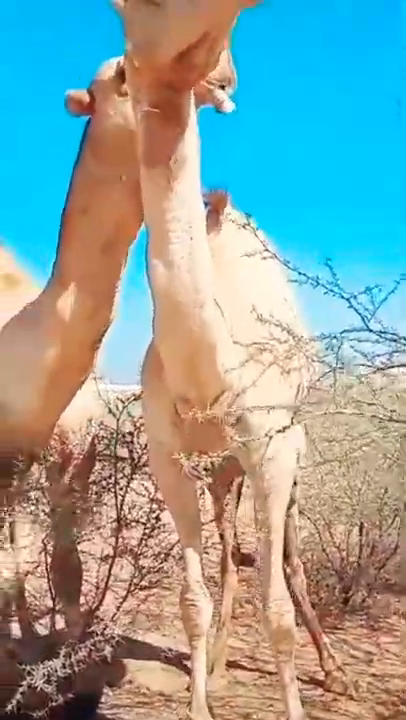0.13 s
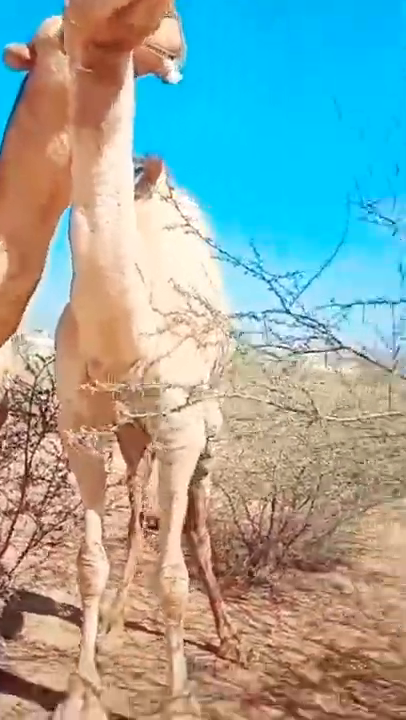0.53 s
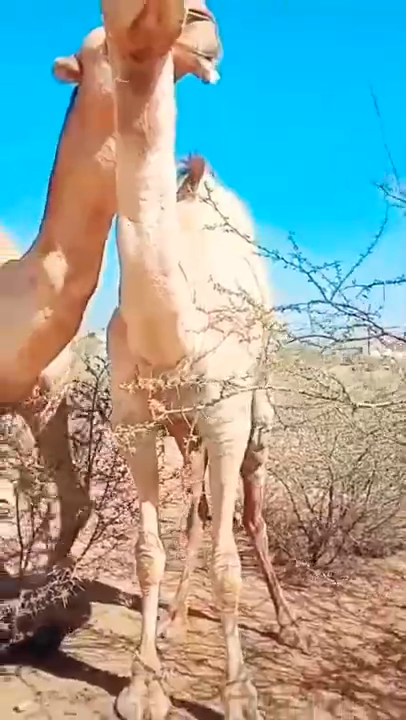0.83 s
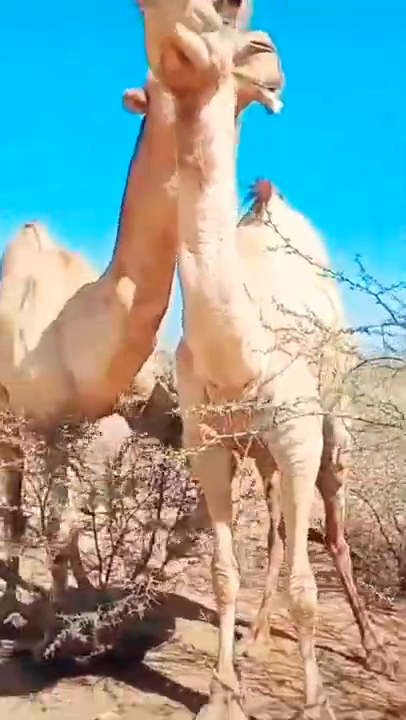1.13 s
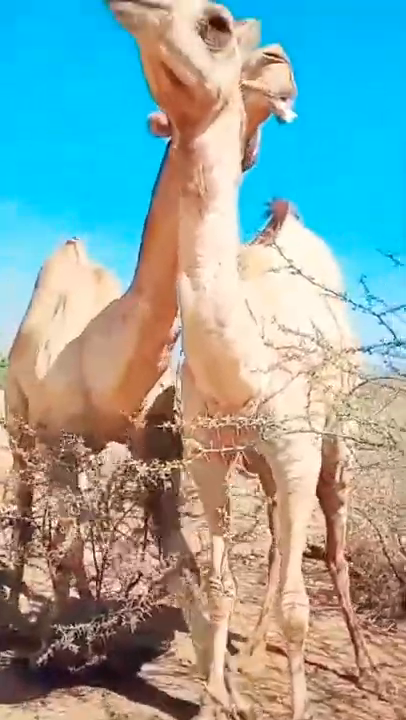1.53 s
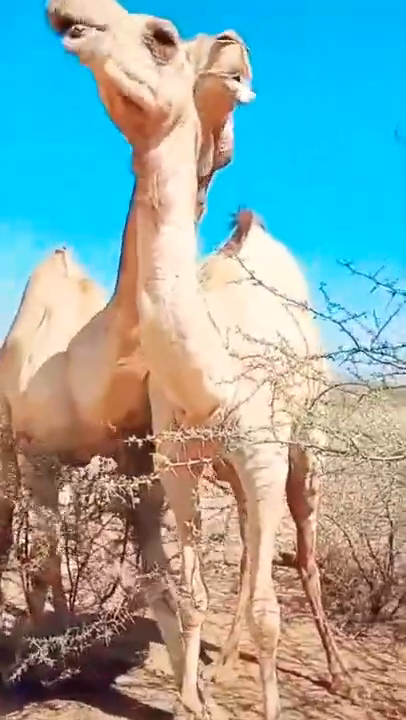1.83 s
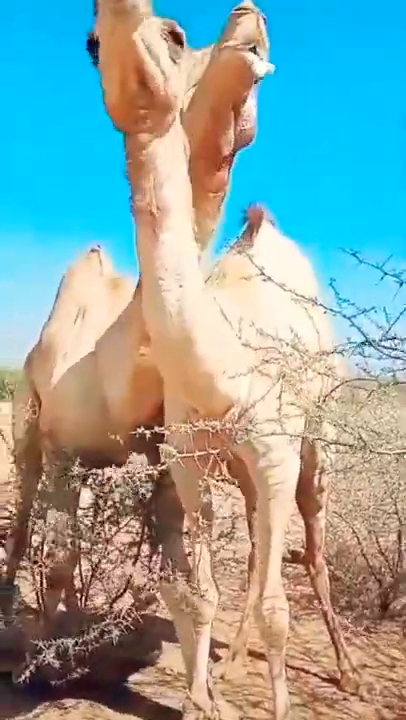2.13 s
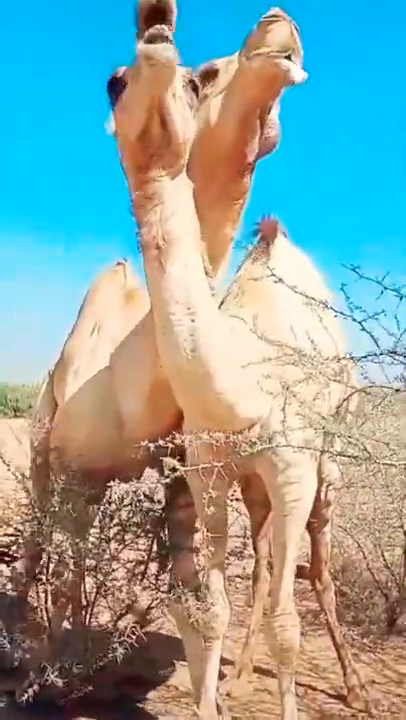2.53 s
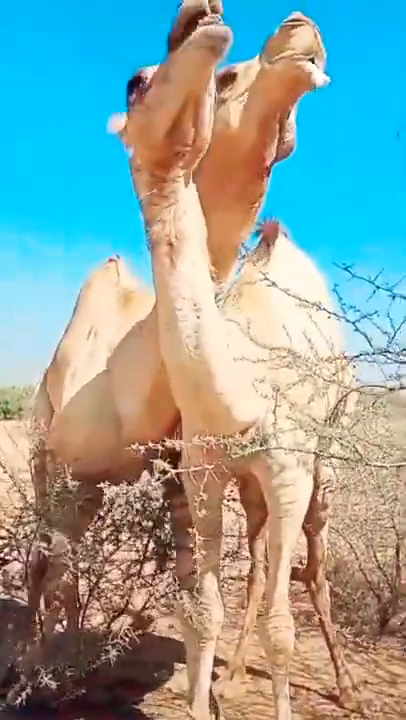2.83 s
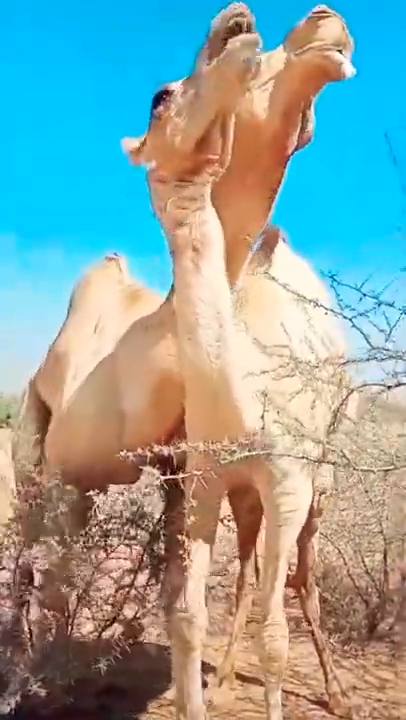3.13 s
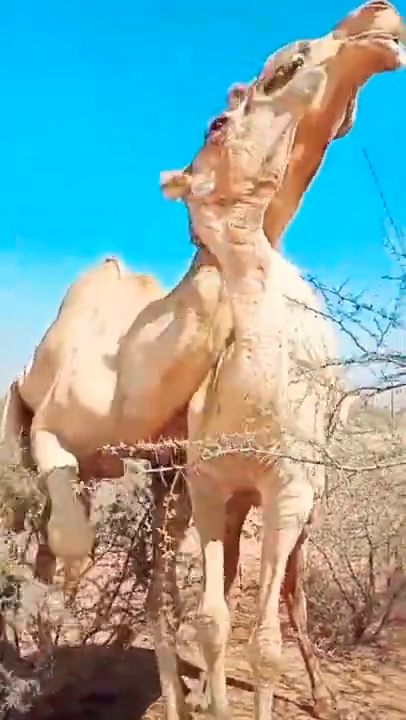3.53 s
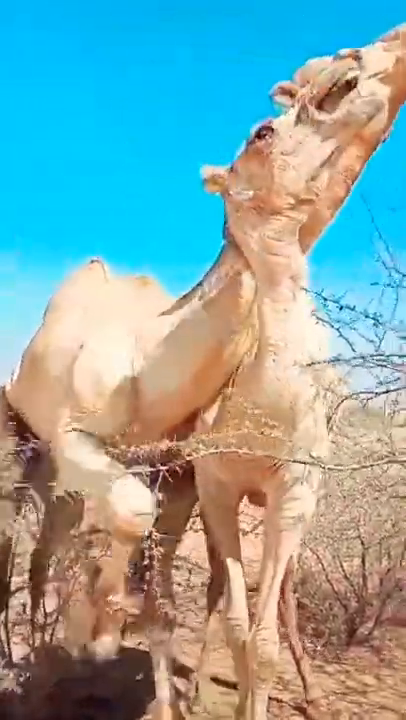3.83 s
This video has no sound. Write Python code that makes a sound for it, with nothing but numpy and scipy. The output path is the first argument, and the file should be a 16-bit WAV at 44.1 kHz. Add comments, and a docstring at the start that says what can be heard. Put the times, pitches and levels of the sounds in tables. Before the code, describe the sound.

Low rasping camel groan starting late, preceded by soft wind buffeting and crackling dry scrub.

```python
"""Camel in dry thorn scrub

Two camels stand before a hand-held mono microphone; one is heard, grumbling faintly, then starting to groan:
clear partials of a low pitch, and uneven fold pulses and breath noise ringing in chest, throat and mouth.
Gusts are filtered noise and short sagging puffs, twigs are filtered clicks and decaying bursts, the hand's
scuffs are dull grains, a hum is one wavering sine, and faint whistles are sines spread by slow noise."""
import sys
import numpy as np
from scipy import signal
from scipy.io import wavfile
from scipy.ndimage import uniform_filter1d

SR = 44100
rng = np.random.default_rng(int(sys.argv[2]) if len(sys.argv) > 2 else 0)


def to_wav(s):
    """Save 16-bit WAV."""
    ch = np.atleast_2d(s).T  # columns
    pcm = np.round(np.clip(ch, -1, 1) * 32767)  # PCM
    wavfile.write(sys.argv[1], SR, pcm.astype(np.int16))


N = 176400

# Wind noise at the microphone, before it dies away: time_s, rumble_level_db, upper_level_db
WIND_LEVELS = [(0.0, -25, -45.5), (0.05, -72, -63), (0.09, -42.5, -63), (0.17, -51, -66), (0.24, -68, -83),
               (0.49, -60.5, -63), (0.63, -63.5, -72.5), (0.76, -63, -60), (0.92, -59.5, -62),
               (1.06, -55, -74.5), (1.4, -65, -74), (1.58, -63.5, -71), (1.67, -49, -86),
               (1.78, -53.5, -84), (1.82, -54.5, -78.5), (1.99, -54.5, -67.5), (2.09, -62, -73.5),
               (2.36, -57, -70.5), (2.5, -65, -74), (2.63, -50.5, -83), (2.79, -57, -71),
               (3.01, -56.5, -72), (3.26, -63, -84), (3.34, -60, -73), (3.44, -53, -66), (3.5, -45.5, -72)]
# Noise densities of the two wind layers: frequency_hz, density_db_per_hz
RUMBLE_SPECTRUM = [(30, -14), (60, 12.5), (120, 10), (200, 11), (300, -35.5), (400, -15)]
UPPER_WIND_SPECTRUM = [(180, -51), (300, 22.5), (450, 3), (650, -8), (900, -7.5), (1300, -4.5)]
WIND_DROP_START_S, WIND_DROP_LENGTH_S = 3.55, 0.07
# Gust thumps: start_s, lower_puff_level_db, mean_pitch_hz, length_cycles, upper_puff_relative_db, sag_0_to_1
GUST_THUMPS = [(0.143, -49.5, 106.6, 2.17, 11, 0.48), (0.198, -44.5, 112, 2.7, -6, 0.55),
               (0.479, -42.5, 211, 4.1, -13, 0.4), (0.57, -44, 213, 4.3, -16, 0.06),
               (1.025, -36.5, 109, 2.67, -23, 0.8), (1.326, -41.5, 100, 2.56, -7.5, 0.46),
               (1.631, -34, 105.5, 3.2, -21, 0.5), (1.668, -55, 108, 1.9, 7, 0.8),
               (1.701, -41.5, 213, 4.5, -36, 0.34), (1.762, -41, 104, 2.7, -15, 0.62),
               (1.818, -34, 105, 1.4, -20, 0.7), (1.883, -34, 140, 4, -18, 0.79),
               (1.943, -32, 100, 3, -22, 0.75), (2.133, -36.5, 110, 2.9, -15, 0.77),
               (2.415, -30.5, 197, 2.86, -41, 0.67), (2.425, -33.5, 105, 2.3, -26, 0.95),
               (2.545, -41.5, 148, 4, -24, 0.6), (2.578, -40, 112, 1.7, -12, 0.86),
               (2.641, -28.5, 137, 2.65, -6, 1), (2.667, -38, 143, 1.53, -12, 1),
               (2.717, -39.5, 106, 2.7, -30, 0.7), (2.85, -31.5, 104.5, 3.6, -10, 0.74),
               (2.868, -31, 140.4, 3.1, -10.5, 0.84), (2.89, -29.5, 107, 1.67, -15.5, 0.63),
               (2.938, -25.5, 162, 3.55, -13.5, 0.63), (2.969, -38, 119, 2.8, -22, 0.4),
               (3.243, -26.5, 109, 4.2, -12.5, 0.4), (3.255, -21.5, 180, 3.72, -18, 0.58),
               (3.297, -33.5, 102, 2.84, -11, 0.93), (3.423, -22.5, 109.5, 2.23, -12, 0.74),
               (3.437, -31, 180, 2.9, -15.5, 0.24), (3.491, -40, 124, 3.2, -3, 0.65),
               (3.551, -34, 110, 2.3, -5, 0.18), (3.672, -33, 104, 2.6, -8, 0.53)]
UPPER_PUFF_RATIO = 2.203  # upper puff's frequency over the lower one's

# Wavering hum: time_s, level_db
HUM_LEVELS = [(0, -42), (.15, -44), (.25, -49.5), (.4, -54), (.5, -62), (.57, -81), (.65, -59.5),
              (.75, -52.5), (.95, -47.5), (1.08, -46.5), (1.2, -48.5), (1.3, -51), (1.4, -56), (1.55, -55),
              (1.7, -50.5), (1.85, -47), (2.05, -46), (2.2, -49), (2.36, -54.5), (2.45, -65), (2.52, -56),
              (2.62, -53), (2.72, -45.5), (2.76, -48.5), (2.8, -41), (2.86, -48.5), (3.0, -49.5),
              (3.11, -46.5), (3.22, -49.5), (3.4, -53.5), (3.6, -53), (3.8, -54), (4, -49)]
HUM_HZ, HUM_WAVER_DB = 90.7, 1.0

# Rustle of the scrub: time_s, low_mids_level_db, high_mids_level_db, treble_level_db, top_level_db
RUSTLE_LEVELS = [(0.0, -100, -65.5, -70.5, -80), (0.19, -72, -75, -78, -77), (0.33, -68.5, -62, -66, -69),
                 (0.51, -71, -69, -69.5, -72.5), (0.71, -68, -62, -81, -80), (0.9, -68, -62, -63, -67),
                 (1.02, -69.5, -60, -62, -62), (1.16, -70, -65.5, -63, -63), (1.3, -71.5, -68, -69, -64),
                 (1.5, -81, -75.5, -79.5, -69.5), (1.63, -73.5, -74.5, -67, -61),
                 (1.76, -75.5, -75, -73.5, -70), (1.94, -85, -78.5, -83, -73),
                 (2.19, -71.5, -69, -73, -72.5), (2.35, -80, -76.5, -81, -73), (2.62, -73, -83, -89, -80),
                 (2.82, -81, -81.5, -79.5, -73), (2.95, -60, -66, -70, -87), (3.1, -75, -73, -74, -61.5),
                 (3.25, -70, -65, -69.5, -66), (3.39, -69.5, -62, -60.5, -59),
                 (3.56, -62.5, -58.5, -63.5, -59), (3.75, -61, -53, -62.5, -54.5),
                 (3.88, -49.5, -70, -62.5, -55.5), (4.0, -55.5, -73, -72.5, -61.5)]
# Noise densities of the four rustle layers: frequency_hz, density_db_per_hz
LOW_MIDS_SPECTRUM = [(500, -4), (800, -6.5), (1300, -1.5), (1900, -9), (2600, -9)]
HIGH_MIDS_SPECTRUM = [(1500, -2), (2200, 1), (3000, 0), (4000, -3), (5000, -5), (6500, -70)]
TREBLE_SPECTRUM = [(4000, -56.5), (5200, 10), (6500, 8), (7300, 3), (8300, -8), (9300, -8)]
TOP_SPECTRUM = [(7800, -12.5), (9500, -4), (11500, 3), (13000, -11), (14200, -13), (15000, 11.5),
                (16500, -3.5)]
GRAINS_PER_S, GRAIN_SHARE = 900, 0.45
# Crunches of dry twigs: start_s, length_s, low_mids_level_db, high_mids_level_db, treble_level_db
TWIG_CRUNCHES = [(0.04, 0.023, -68, -61.5, -67), (0.346, 0.14, -64, -58.5, -78),
                 (0.46, 0.082, -69, -69, -86), (0.634, 0.11, -90, -60.5, -58.5),
                 (0.83, 0.027, -49, -55, -85), (0.849, 0.033, -46.5, -54.5, -68),
                 (1.311, 0.058, -78, -80, -61.5), (1.448, 0.088, -70, -64.5, -64),
                 (1.498, 0.18, -71, -65.5, -56), (1.626, 0.099, -66.5, -62.5, -76),
                 (1.895, 0.019, -77, -80, -66), (1.937, 0.053, -86, -79, -63),
                 (2.076, 0.047, -88, -66, -57), (2.191, 0.017, -86, -90, -62),
                 (2.245, 0.088, -66.5, -73, -77), (2.388, 0.036, -73.5, -74, -66.5),
                 (2.585, 0.064, -74, -89, -70), (2.881, 0.1, -58, -54, -64),
                 (2.974, 0.08, -64.5, -62.5, -69), (3.128, 0.098, -65.5, -65, -63),
                 (3.262, 0.076, -64.5, -67, -67), (3.648, 0.058, -45.5, -60, -51),
                 (3.907, 0.017, -51, -72, -57)]
CRUNCH_GRAINS_PER_S = 2800
FADE_SHARE = 0.41  # each fade of a crunch or scuff, as a share of its length
# Twig snaps: start_s, peak_db, treble_relative_db, t60_s
TWIG_SNAPS = [(0.0366, -51.5, 16, 0.014), (0.1552, -45, -3.5, 0.064), (0.2232, -22, -9, 0.013),
              (0.7147, -35.5, -21, 0.014), (0.842, -48, -20, 0.03), (0.861, -39, -28, 0.076),
              (1.824, -51, 8, 0.041), (1.898, -61, -6, 0.021), (1.961, -45.5, 13, 0.026),
              (2.0911, -52, 11, 0.043), (2.237, -49, 0, 0.09), (2.3975, -53, 4, 0.042),
              (2.7477, -65, 2, 0.022), (2.8807, -50.5, 9, 0.041), (2.9343, -36, -13, 0.049),
              (3.043, -43, -24, 0.054), (3.2633, -35, -10.5, 0.06), (3.4762, -40, -17, 0.036),
              (3.663, -39, 7, 0.042), (3.91, -51, -15, 0.06)]
SNAP_TICK = 3.23  # first sample of a snap, against noise of spread 1 after it

# Scuffs of the hand: start_s, length_s, level_below_500_hz_db, level_above_500_hz_db
HANDLING_SCUFFS = [(0, 0.12, -48.5, -88), (0.125, 0.11, -55, -79), (0.412, 0.02, -54, -62.5),
                   (0.432, 0.14, -51.5, -63.5), (0.47, 0.076, -72, -57.5), (0.546, 0.12, -60, -63.5),
                   (0.672, 0.1, -58.5, -69), (0.78, .2, -61.5, -65.5), (1.31, 0.073, -62, -74),
                   (1.442, 0.091, -58.5, -79), (1.62, 0.087, -68, -83), (1.86, .12, -71, -79),
                   (1.999, 0.089, -65, -77), (2.964, 0.13, -78, -76)]
HANDLING_GRAINS_PER_S = 700

# Groan: time_s, pitch_hz, low_partials_level_db, rasp_level_db, upper_rasp_level_db,
# partials_around_fifth_relative_db
GROAN_COURSE = [(3.54, 52.57, -52.5, -80, -61, -7), (3.56, 52.26, -45, -59, -64, -3.5),
                (3.61, 50.26, -43, -43.5, -55, -11), (3.688, 52.82, -37.5, -40, -55, 2),
                (3.702, 51.53, -32.5, -28.5, -57.5, -3.5), (3.792, 51.9, -28.5, -24.5, -38, -0.5),
                (3.848, 49.64, -32.5, -27, -45, 5), (3.86, 48.8, -31.5, -24, -35.5, 1),
                (3.902, 49.5, -33, -34, -50, 3), (3.916, 48.23, -33, -38.5, -46, -6),
                (3.934, 47.45, -31.5, -36.5, -57, -2), (3.962, 46.4, -35.5, -53.5, -46.5, -1.5),
                (3.972, 45.6, -32, -41, -48, -3), (4.0, 43.03, -37, -70, -56, -4)]
GROAN_ATTACK_S = 0.045  # ends at the first row of the groan
# Clear low partials: multiple_of_pitch, relative_level_db
LOW_PARTIALS = [(2, -24), (3, -14), (4, -8), (5, 0), (6, -27), (7, -11), (8, -14), (9, -20), (10, -16),
                (11, -27), (12, -25)]
PARTIAL_WAVER_DB, PARTIAL_WAVER_HZ = 1.6, 8
# Resonances of chest, throat and mouth: frequency_hz, width_hz, gain_db
CHEST_RESONANCES = [(170, 80, -8), (290, 30, 0), (430, 120, -12), (600, 120, -18)]
THROAT_RESONANCES = [(781, 51.5, -7), (911, 53.4, 1), (1035, 94, -1.5), (1243, 94, -17)]
MOUTH_RESONANCES = [(1786, 71, 10.5), (2026, 84, 9), (2326, 100, 9.5), (2550, 110, -21), (2890, 250, -18),
                    (3580, 100, -18.5)]
# Chest noise, rough at first, then clear: time_s, level_relative_to_partials_db
CHEST_NOISE = [(3.54, -6), (3.63, -1), (3.69, -18), (4, -24)]
# Opening of throat and mouth, tilting their resonances: time_s, throat_db_per_octave, mouth_db_per_octave
VOCAL_OPENING = [(3.58, -13, -3), (3.63, 33, 12), (3.67, 2, -27), (3.72, -13, -16), (3.79, -27, 12),
                 (3.86, -4, 10), (3.92, -15, -2), (4, -5, -30)]
# Faint grumbles through the same throat: start_s, length_s, level_db
FAINT_GRUMBLES = [(1.318, 0.29, -66), (1.46, 0.064, -66.5), (2.249, 0.094, -58), (2.587, 0.018, -57.5),
                  (3, 0.13, -84)]
JITTER_PERIODS, PULSE_SPREAD_DB = .03, 1.5
BREATH_SHARE, SECOND_PULSE = .55, .75  # second of the two pulses in a period, against the first
EVEN_S, EVEN_SHARE = .012, .3  # the throat's rasp is held even over about one pulse

# Faint whistles, perhaps far birds: start_s, length_s, from_hz, to_hz, noise_corner_hz, level_db
FAINT_WHISTLES = [(1.931, 0.29, 2496, 2580, 199, -65), (2.52, .07, 4300, 3780, 80, -74),
                  (2.603, 0.045, 3160, 2880, 60, -63), (2.744, 0.014, 3360, 3340, 100, -66.5)]

CUTOFF_HZ = 16100


def amp(db):
    """Decibel law: 20 dB is a factor of ten in amplitude."""
    return 10 ** (np.asarray(db) / 20)


def rms_one(x):
    """Power normalisation: the root mean square becomes 1."""
    return x / np.sqrt(np.mean(x ** 2) + 1e-20)


def in_time(rows):
    """Linear interpolation: each column becomes a curve over the scene."""
    time_s, *columns = np.transpose(rows)
    return [np.interp(np.arange(N) / SR, time_s, column) for column in columns]


def drift(corner_hz):
    """Low-pass filtered chance: two equal poles leave slow wandering of rms 1."""
    r = np.exp(-80 * np.pi * corner_hz / SR)  # runs at a fortieth of the sample rate
    slow = signal.lfilter([1], [1, -2 * r, r * r], rng.standard_normal(N // 40 + 2002))[2000:]
    return np.interp(np.arange(N) / 40, np.arange(len(slow)), rms_one(slow))


def band(x, low_hz, high_hz):
    """Band-pass filtering: a Butterworth response keeps the range between two edges."""
    sos = signal.butter(2, [low_hz, min(high_hz, .45 * SR)], "band", fs=SR, output="sos")
    return signal.sosfilt(sos, x)


def coloured(sources, spectrum, patchy_db, patch_hz, step=0.3844):
    """Spectral shaping: bands a fraction of an octave wide have their own level and flicker; rms 1."""
    hz, db = np.transpose(spectrum)
    edges = 2 ** np.arange(np.log2(hz[0]), np.log2(hz[-1]) + step, step)
    out, shared = 0, drift(patch_hz)
    for k, (low, high) in enumerate(zip(edges, edges[1:])):
        flicker_db = patchy_db * (.7 * shared + drift(patch_hz))
        gain_db = np.interp(np.log(low * high) / 2, np.log(hz), db) + flicker_db
        out = out + amp(gain_db) * band(sources[k % 2], low, high)
    return rms_one(out)


def crackle(rate):
    """Random point process: two trains of clicks of uneven size and sign; joint rms 1."""
    clicks = rng.random((2, N)) < rate / SR
    size_db = 2.8 * np.minimum(rng.exponential(1, N), 4)
    return rms_one(clicks * amp(size_db) * rng.choice([-1, 1], N))


def faded(start_s, length_s):
    """Amplitude envelope: linear rise, plateau and linear fall."""
    u = (np.arange(N) / SR - start_s) / length_s
    return np.clip(np.minimum(u, 1 - u) / FADE_SHARE, 0, 1)


def wind():
    """Turbulence at the microphone: low noise, and puffs of a few cycles whose pitch sags."""
    rumble_db, upper_db = in_time(WIND_LEVELS)
    white = rng.standard_normal((2, N))
    rumble = coloured(white, RUMBLE_SPECTRUM, patchy_db=0.0, patch_hz=13.4)
    upper = coloured(white[::-1], UPPER_WIND_SPECTRUM, patchy_db=1.2, patch_hz=12)
    # the noise, not the thumps, falls to a tenth
    dying = np.clip(1 - (np.arange(N) / SR - WIND_DROP_START_S) / WIND_DROP_LENGTH_S, .1, 1)
    out = dying * (amp(rumble_db) * rumble + amp(upper_db) * upper)
    for start_s, db, hz, cycles, upper_rel_db, sag in GUST_THUMPS:
        u = np.linspace(0, 1, int(cycles / hz * SR))
        # frequency slides from (1 + sag) to (1 - sag) times its mean
        phase = 2 * np.pi * cycles * (u + sag * u * (1 - u))
        lower_puff = np.sin(np.pi * u ** 1.03) ** 2 * np.sin(phase)
        upper_puff = np.sin(np.pi * u ** 1.65) ** 2 * np.sin(UPPER_PUFF_RATIO * phase)
        i = int(start_s * SR)
        out[i:i + len(u)] += amp(db) * (lower_puff + amp(upper_rel_db) * upper_puff)
    return out


def hum():
    """Amplitude modulation: one low sine whose level wavers."""
    level_db, = in_time(HUM_LEVELS)
    tone = np.sqrt(2) * np.sin(2 * np.pi * HUM_HZ * np.arange(N) / SR)
    return amp(level_db + HUM_WAVER_DB * drift(6.9)) * tone


def rustle():
    """Granular noise: hiss mixed with clicks, shaped in four layers; also gives a treble layer for crunches."""
    low_db, mids_db, treble_db, top_db = in_time(RUSTLE_LEVELS)
    sources = GRAIN_SHARE * crackle(GRAINS_PER_S) + (1 - GRAIN_SHARE) * rng.standard_normal((2, N))
    low = coloured(sources[::-1], LOW_MIDS_SPECTRUM, patchy_db=1.2, patch_hz=12)
    mids = coloured(sources, HIGH_MIDS_SPECTRUM, patchy_db=1.2, patch_hz=12)
    treble = coloured(sources[::-1], TREBLE_SPECTRUM, patchy_db=1.0, patch_hz=12, step=.2)
    top = coloured(sources, TOP_SPECTRUM, patchy_db=1.0, patch_hz=12, step=.2)
    out = amp(low_db) * low + amp(mids_db) * mids + amp(treble_db) * treble + amp(top_db) * top
    return out, rms_one(treble + 1.32 * top)


def crunches(treble):
    """Superposition of small fractures: dense clicks in two bands, with the rustle's treble, under envelopes."""
    dense = crackle(CRUNCH_GRAINS_PER_S)
    low_mids = rms_one(band(dense[0], 970, 2280))
    high_mids = rms_one(band(dense[1], 1750, 5500))
    layers = np.array([low_mids, high_mids, treble])
    return sum(faded(start_s, length_s) * (amp(levels_db) @ layers)
               for start_s, length_s, *levels_db in TWIG_CRUNCHES)


def snaps():
    """Impulsive fracture: a sharp tick, then noise decaying exponentially, in two bands."""
    out = np.zeros(N)
    for start_s, peak_db, treble_rel_db, t60_s in TWIG_SNAPS:
        burst = rng.standard_normal(3000)
        burst[0] = SNAP_TICK
        burst *= amp(-60 * np.arange(3000) / SR / t60_s)
        crack = band(burst, 1050, 5670) + amp(treble_rel_db) * band(burst, 3950, 11900)
        i = int(start_s * SR)
        out[i:i + 3000] += amp(peak_db) * crack / np.abs(crack).max()
    return out


def scrub():
    """Superposition: rustling, crunching and snapping of dry twigs add."""
    rustling, treble = rustle()
    return rustling + crunches(treble) + snaps()


def handling():
    """Friction on the microphone's case: random grains, band-passed twice, make dull scuffs."""
    grains = crackle(HANDLING_GRAINS_PER_S)
    lower = rms_one(band(band(grains[0], 200, 436), 200, 436))
    upper = rms_one(band(band(grains[1], 474, 920), 474, 920))
    layers = np.array([lower, upper])
    return sum(faded(start_s, length_s) * (amp(levels_db) @ layers)
               for start_s, length_s, *levels_db in HANDLING_SCUFFS)


def resonate(x, peaks, tilt_db=0):
    """Parallel resonance: two-pole filters with alternating signs; a tilt favours the upper or lower ones."""
    out, power = 0, 0
    for k, (hz, width_hz, db) in enumerate(peaks):
        # 1.5 makes up for the narrowing by two passes
        r = np.exp(-np.pi * 1.5 * width_hz / SR)
        b = (1 - r * r) / 2 * np.array([1, 0, -1])
        a = [1, -2 * r * np.cos(2 * np.pi * hz / SR), r * r]
        ring = signal.lfilter(b, a, signal.lfilter(b, a, x))
        gain = amp(db + tilt_db * np.log2(hz / peaks[1][0]))
        out = out + (-1) ** k * gain * ring
        power = power + gain ** 2 * np.mean(ring ** 2)
    return out / np.sqrt(power)


def evened(x):
    """Dynamic compression: moments of high running level are partly pulled down; rms 1."""
    level = np.sqrt(uniform_filter1d(x ** 2, int(EVEN_S * SR)) + .05)
    return rms_one(x / level ** EVEN_SHARE)


def clear_partials(cycles, around_db):
    """Harmonic series: sines at multiples of the pitch; all but the fifth waver."""
    out = 0
    for k, db in LOW_PARTIALS:
        if k != 5:
            db = db + around_db + PARTIAL_WAVER_DB * drift(PARTIAL_WAVER_HZ)
        out = out + np.sqrt(2) * amp(db) * np.sin(2 * np.pi * (k * cycles + rng.random()))
    return out


def fold_source(cycles):
    """Glottal excitation: two uneven fold pulses a period, and breath noise fading after each; also the breath."""
    halves = 2 * (cycles + JITTER_PERIODS * drift(40))
    closing = np.diff(np.floor(halves), prepend=0) > 0
    strength = np.where(np.floor(halves) % 2, SECOND_PULSE, 1) * amp(PULSE_SPREAD_DB * rng.standard_normal(N))
    pulses = closing * strength
    breath = rng.standard_normal(N) * np.exp(-1.5 * (halves % 1))
    return (1 - BREATH_SHARE) * rms_one(pulses) + BREATH_SHARE * rms_one(breath), breath


def camel():
    """Source-filter voice: pulses and breath excite chest, throat and mouth beside clear low partials."""
    pitch_hz, low_db, rasp_db, upper_db, around_db = in_time(GROAN_COURSE)
    throat_tilt_db, mouth_tilt_db = in_time(VOCAL_OPENING)
    chest_db, = in_time(CHEST_NOISE)
    t = np.arange(N) / SR
    cycles = np.cumsum(pitch_hz) / SR
    low = clear_partials(cycles, around_db)
    source, breath = fold_source(cycles)
    chest = resonate(breath, CHEST_RESONANCES)
    throat = evened(resonate(source, THROAT_RESONANCES, throat_tilt_db))
    mouth = resonate(source, MOUTH_RESONANCES, mouth_tilt_db)
    onset = np.clip((t - GROAN_COURSE[0][0]) / GROAN_ATTACK_S + 1, 0, 1)
    body = amp(low_db) * (low + amp(chest_db) * chest)
    out = onset * (body + amp(rasp_db) * throat + amp(upper_db) * mouth)
    for start_s, length_s, db in FAINT_GRUMBLES:
        swell = np.sin(np.pi * np.clip((t - start_s) / length_s, 0, 1))
        out += amp(db) * swell * throat
    return out


def whistles():
    """Narrow-band modulation: slow noise spreads a gliding sine into a breathy tone."""
    out, t = np.zeros(N), np.arange(N) / SR
    for start_s, length_s, from_hz, to_hz, corner_hz, db in FAINT_WHISTLES:
        u = np.clip((t - start_s) / length_s, 0, 1)
        glide_hz = from_hz + (to_hz - from_hz) * u
        tone = np.sin(2 * np.pi * np.cumsum(glide_hz) / SR)
        out += amp(db) * np.sin(np.pi * u) * drift(corner_hz) * tone
    return out


def scene():
    """Linear superposition: all sources add, alike in both channels."""
    mono = wind() + hum() + scrub() + handling() + camel() + whistles()
    return np.array([mono, mono])


def record(dry):
    """Band limiting: the microphone loses the lowest bass; the top is cut steeply."""
    dry = signal.sosfilt(signal.butter(2, 45, "high", fs=SR, output="sos"), dry)
    return signal.sosfilt(signal.cheby2(24, 60, CUTOFF_HZ, fs=SR, output="sos"), dry)


dry = scene()
out = record(dry)
to_wav(out)
```